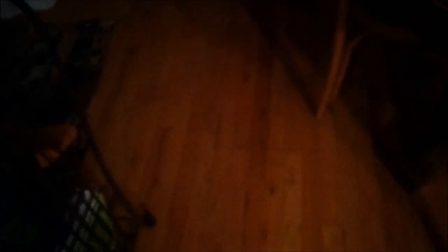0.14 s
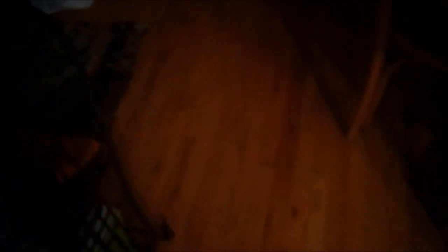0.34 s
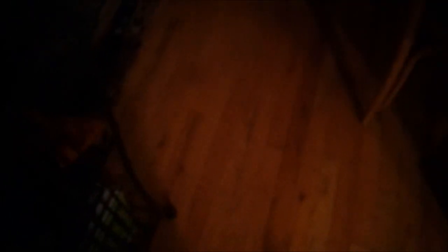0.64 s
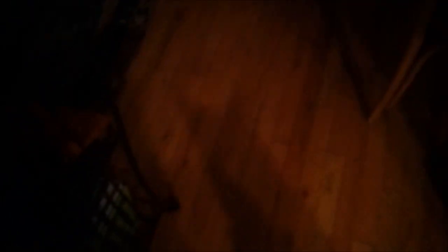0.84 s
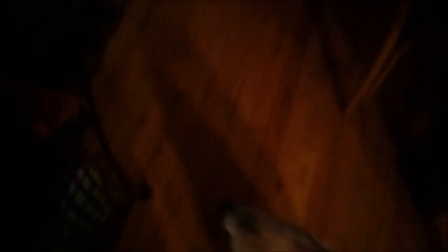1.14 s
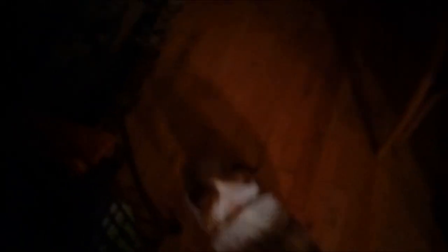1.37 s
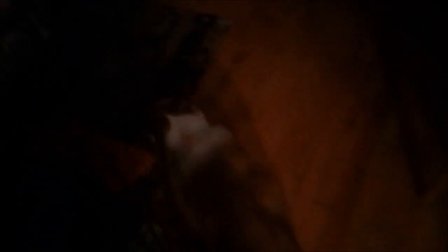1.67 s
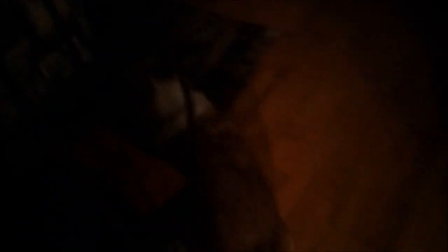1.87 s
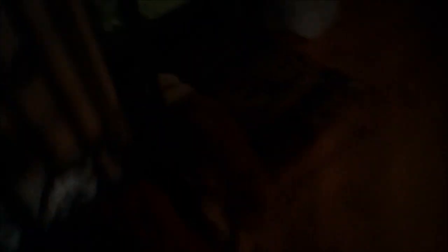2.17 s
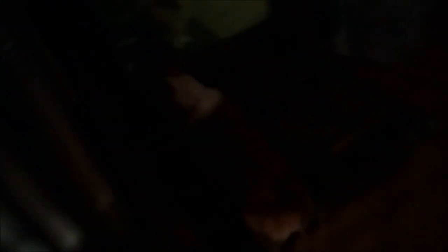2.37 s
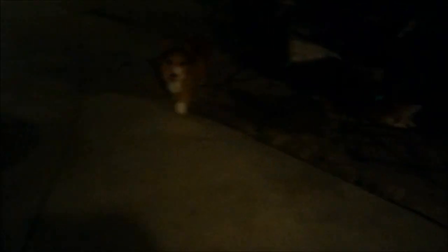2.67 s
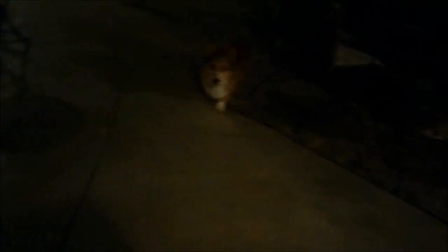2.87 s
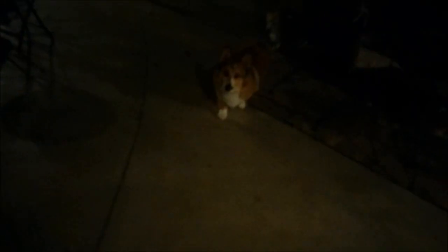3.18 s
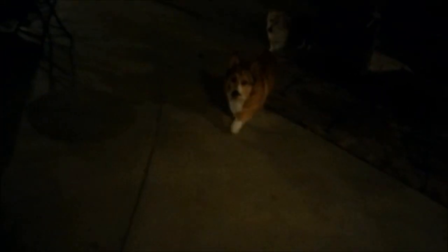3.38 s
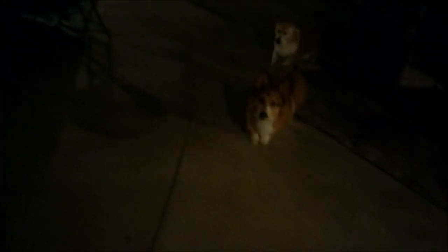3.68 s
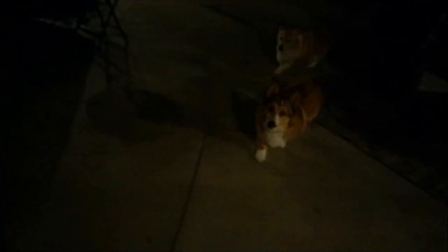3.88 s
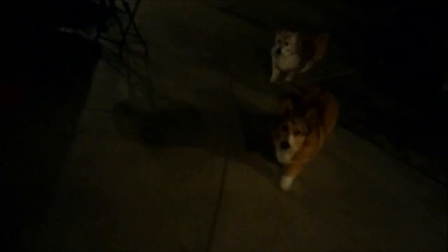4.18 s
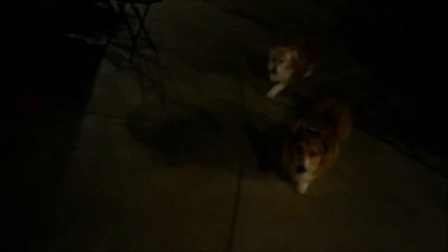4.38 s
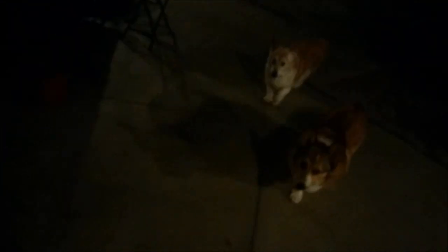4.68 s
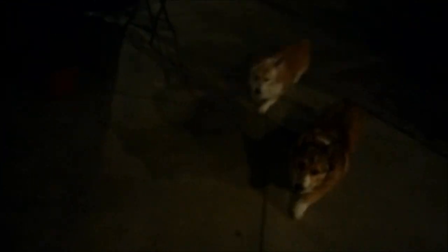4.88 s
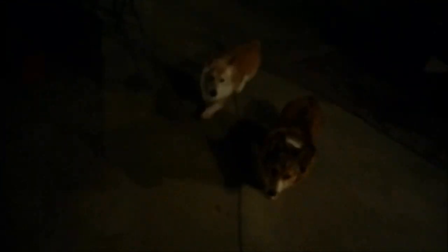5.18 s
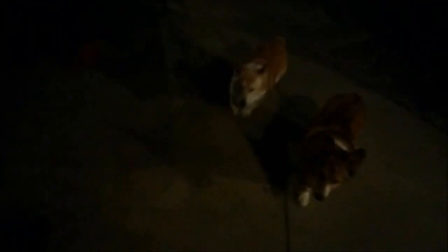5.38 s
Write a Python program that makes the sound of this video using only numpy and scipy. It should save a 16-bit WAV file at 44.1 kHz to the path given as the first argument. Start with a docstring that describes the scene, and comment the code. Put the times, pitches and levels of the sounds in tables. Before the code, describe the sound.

A dog's claws clatter quickly across a hardwood floor up close, then two dogs pad over concrete outdoors with faint ticks and scuffs.

```python
"""A dog trots across a hardwood floor nearby: each claw contact is a noise impact split into a tick, a knock
and a board thud, and the room answers as decaying noise whose tail is cut short. Then, outdoors, two dogs pad
over concrete: short claw impacts with gritty friction scuffs, and a collar tag made of decaying sine modes.
Behind them are a distant machine hum (wavering harmonics), low bumps near the microphone (sagging sines with
dull noise), and a background of filtered noise."""
import sys
import numpy as np
from scipy import signal
from scipy.fft import rfft, irfft, next_fast_len
from scipy.io import wavfile
from scipy.ndimage import uniform_filter1d, map_coordinates

SR = 44100
rng = np.random.default_rng(int(sys.argv[2]) if len(sys.argv) > 2 else 0)


def put_to_file(sound):
    """Save the sound as 16-bit audio at rate SR, in the file named by the first command-line argument."""
    columns = np.atleast_2d(sound).T  # one column per channel
    safe = np.clip(columns, -1, 1)
    whole_steps = np.round(safe * 32767)
    wavfile.write(sys.argv[1], SR, whole_steps.astype(np.int16))


N = 243814

# Levels in the tables are nominal source levels, before the fluctuations and gains in the functions.

# Quiet room noise, spectrum: hz, level_db
QUIET_SPECTRUM = [(18, -51), (30, -4.5), (350, -7.5), (519, -9), (676, -1.5), (4290, -24), (9990, -18.5),
                  (15200, -29.5), (16500, -49)]
# Outdoor background over time: time_s, rumble_db, rustle_db
AIR_LEVELS = [(2.3, -71.5, -72), (2.47, -66, -79), (2.69, -63.5, -78), (2.9, -62.5, -68),
              (3.15, -64.5, -76), (3.41, -63, -67), (3.52, -63.5, -77.5), (3.73, -66, -74.5),
              (4.3, -67.5, -72), (5.24, -66, -71), (5.53, -72, -72.5)]
# Far rumble, spectrum: hz, level_db
RUMBLE_SPECTRUM = [(25, -4), (77, 9.5), (120, 1), (250, 3.5), (420, -5), (640, -0.5), (720, 2.5), (800, -5),
                   (1000, -8.5), (1400, -25), (2000, -50.5)]
# Thin hiss, spectrum: hz, level_db
HISS_SPECTRUM = [(900, -15.5), (1400, 3.5), (2500, -4.5), (4000, -5.5), (5500, -12.5), (7000, -35.5)]
# Grit on concrete, spectrum: hz, level_db
RUSTLE_SPECTRUM = [(3500, -44), (5000, -28), (5800, -11), (8600, -1), (13000, -8.5), (15500, -8),
                   (16500, -30), (17000, -51.5)]
# Machine hum over time: time_s, second_order_db, fourth_order_db, fifth_order_db
HUM_LEVELS = [(2.4, -66, -77, -84), (2.47, -63, -71, -77), (2.63, -43, -57, -60), (2.73, -49, -61, -58),
              (2.88, -42.5, -68, -57), (3.01, -52, -79, -62), (3.07, -40, -84, -64), (3.12, -59, -88, -67),
              (3.19, -45, -88, -66), (3.33, -41.5, -80, -61), (3.58, -52, -67, -52.5),
              (3.83, -59, -71, -63), (4.06, -59, -75.5, -73.5), (4.4, -67, -74.5, -79),
              (4.78, -76, -73.5, -84), (5.15, -80, -76, -64), (5.38, -80, -68, -81), (5.53, -80, -83, -81)]
# Multiples of the machine's base frequency that sound: order (no unit)
HUM_MULTIPLES = [2, 4, 5]
# Low bumps near the microphone: start_s, level_db, mid_pitch_hz
BUMP_EVENTS = [(2.411, -37.5, 138), (2.454, -42, 141), (2.501, -42, 93), (2.56, -40.5, 185),
               (2.64, -34, 172), (2.674, -35, 189), (2.761, -39.5, 85), (2.846, -32, 78), (2.91, -39.5, 73),
               (3.236, -35, 83), (3.449, -44.5, 85), (3.715, -38, 84), (3.932, -47, 76), (4.059, -40.5, 87),
               (4.103, -41.5, 77), (4.19, -50, 127), (4.279, -41, 73), (4.329, -42.5, 85),
               (4.48, -51.5, 62), (4.555, -39, 78), (4.6, -47.5, 86), (4.703, -39, 82), (4.922, -41, 71),
               (5.295, -43.5, 73), (5.469, -40.5, 67)]
# Noisy part of a bump, spectrum: hz, level_db
PUFF_SPECTRUM = [(25, -27.5), (55, -12.5), (80, 0.5), (150, -8.5), (320, -10), (500, -24)]
# Strikes of the collar tag: start_s, level_db
TAG_STRIKES = [(3.4705, -54.5), (3.4925, -59), (3.5128, -71.5), (4.0186, -56), (4.566, -63)]
# Modes of the collar tag: pitch_hz, level_db, t60_s
TAG_MODES = [(1891.6, 2.5, 0.1841), (2365.2, -10, 0.1649), (2808.7, -2, 0.1098), (3540, -13.5, 0.0972)]
# Paws on concrete: start_s, tick_db, knock_db, scuff_relative_to_contact_db, scuff_ms
PAW_STEPS = [(2.7041, -68, -55, -12, 27), (2.7389, -36.5, -51, -12.5, 25), (2.797, -50.5, -59.5, -7, 65),
             (2.823, -33.5, -42, -16, 27), (2.828, -24.5, -29, -12.5, 26), (2.8631, -62, -29, -13.5, 32),
             (2.8671, -61, -21, -19, 16), (2.924, -56.5, -46, -10, 30), (3.2289, -33, -69, -13, 20),
             (3.2345, -41.5, -61.5, -14, 30), (3.3313, -39.5, -58.5, -12, 30),
             (3.3381, -30.5, -51.5, -13, 22), (3.3904, -40.5, -45.5, -10, 31),
             (3.4098, -28, -51.5, -22.5, 17), (3.4485, -50, -64, -6, 30), (3.4805, -44, -54, -13.5, 41),
             (3.7013, -54, -68, -5.5, 30), (3.7503, -58.5, -70, -2.5, 30),
             (3.7904, -51.5, -59.5, -10.5, 37), (3.846, -72, -57, -12, 30), (3.91, -51.5, -67, -8.5, 79),
             (4.047, -50, -63, -15, 30), (4.0774, -43, -53.5, -15, 36), (4.0819, -25.5, -45.5, -20, 14),
             (4.1434, -50, -73, -15.5, 24), (4.1859, -49, -73, -12, 28), (4.208, -51, -65.5, -3, 30),
             (4.2452, -41.5, -39.5, -12.5, 53), (4.2517, -35.5, -38, -2.5, 26),
             (4.3744, -38.5, -66, -18.5, 37), (4.3784, -32, -63, -20.5, 21), (4.4669, -53, -60, -11.5, 28),
             (4.5785, -50, -70, -14.5, 28), (4.6343, -35, -51.5, -11.5, 42),
             (4.6404, -36.5, -51.5, -12, 30), (4.6638, -51, -56, -6, 35), (4.7458, -46.5, -69, -20, 30),
             (4.8014, -29.5, -72, -14, 22), (4.808, -29.5, -71, -21, 32), (4.8485, -23, -41.5, -21, 30),
             (5.003, -50, -57.5, -11.5, 30), (5.0548, -38.5, -42.5, -.5, 42), (5.1003, -59, -31.5, -11, 17),
             (5.1409, -58, -75, -2.5, 34), (5.1903, -59.5, -56.5, -15, 25), (5.2235, -30.5, -73, -10, 30),
             (5.2264, -36.5, -57.5, -10, 30), (5.3964, -51, -74, -14, 30), (5.4213, -43, -69, -14, 30),
             (5.4812, -38.5, -38.5, -17.5, 33), (5.4859, -38.5, -40.5, -2.5, 43)]
# Bursts on the boards: start_s, tick_db, knock_db, thud_db, knock_pitch_hz, room_relative_to_contact_db
# They are claw contacts, except the one at .107 s: a faint smear of noise just before a contact.
BOARD_BURSTS = [(.045, -75, -62.5, -68.5, 1890, -9.5), (.107, -40.5, -39, -68, 1384, -10.5),
                (.111, -25, -30, -43, 3090, -11), (.124, -15.5, -22, -35.5, 1993, -11.5),
                (.206, -19.5, -25.5, -39, 2790, -14), (.294, -10, -21, -32.5, 3471, -14),
                (.43, -53, -39, -78, 1155, -19), (.488, -24.5, -29, -55, 3154, -11),
                (.501, -17.5, -21.5, -39.5, 3353, -12), (.569, -20.5, -26, -42.5, 2360, -10.5),
                (.646, -42.5, -41, -37, 2230, -10.5), (.683, -21.5, -31.5, -47, 1770, -16.5),
                (.689, -26, -42, -52, 3176, -15), (.752, -55, -33, -67, 2221, -17),
                (.887, -23, -30, -73, 2582, -12), (.913, -16.5, -22, -63, 2020, -11.5),
                (.992, -24, -27, -67, 1423, -11), (.999, -25, -31, -57, 2413, -10),
                (1.044, -34, -36, -49.5, 2390, -4.5), (1.074, -18, -22.5, -31.5, 2040, -13),
                (1.213, -59, -60.5, -65, 3700, -7), (1.267, -20.5, -27, -43.5, 3260, -13.5),
                (1.288, -15.5, -20, -32.5, 1688, -11), (1.377, -24.5, -34, -52, 4500, -12),
                (1.384, -23.5, -27.5, -36, 3196, -7), (1.461, -21.5, -29.5, -33, 2105, -12),
                (1.647, -21, -29, -42, 1740, -10), (1.654, -17.5, -23, -31.5, 1520, -10),
                (1.742, -27, -32.5, -35, 3361, -5), (1.776, -29, -27, -44, 2072, -8),
                (1.826, -26.5, -34.5, -39.5, 3270, -6.5), (1.99, -24, -35, -46, 3130, -6.5),
                (2.022, -16.5, -24.5, -33, 3630, -12), (2.14, -46, -33.5, -43, 4026, -5),
                (2.202, -26.5, -26, -37.5, 4678, -12), (2.304, -67.5, -58, -63.5, 1740, -11),
                (2.436, -78, -60, -44, 1400, -11)]
# Floorboards, spectrum: hz, level_db
BOARD_SPECTRUM = [(45, -40), (80, -13), (150, -1), (300, 1.5), (600, -7), (900, -27)]
# Claw body on the ground, spectrum: hz, level_db
KNOCK_SPECTRUM = [(400, -40), (700, -6), (1100, -3.5), (2200, -2), (3500, -2.5), (4600, -4), (6000, -29.5)]
# Claw tip, spectrum: hz, level_db
TICK_SPECTRUM = [(3500, -40), (5000, 4), (6500, 4.5), (9500, 3), (12000, -1.5), (15500, -10),
                 (16400, -23.5), (17000, -47.5)]

TOP_HZ = 17050  # upper band limit
OUTDOOR_START_S = AIR_LEVELS[0][0]
QUIET_DB = -58.5  # rms of the room noise
HISS_DB, HISS_FOLLOWS = -75, .6  # the hiss moves by this share of the rustle's change in dB
HUM_HZ, FLUTTER_DB = 107.63, 4.5  # base frequency; fast wavering of each order
BUMP_MS = 58  # full length
BOARD_CONTACT_MS, STONE_CONTACT_MS = 3.0, 1.3  # decay constants of the claw contact
THUD_HZ, THUD_HZ_PER_S = 360, -78  # the boards sound deeper along the dog's path
CUT_S, CUT_S_PER_DB = .138, .0022  # when the decaying tail is cut short, sooner for weak bursts
# light scuffs between the steps
FAINT_PER_S, FAINT_SPREAD_DB = 7, 3.5
FAINT_TICK_DB, FAINT_KNOCK_DB, FAINT_SCUFF_DB, FAINT_SCUFF_MS = -72, -70, 2.5, 35


def amp(db):
    """Decibel law: level to amplitude ratio."""
    return 10 ** (np.asarray(db) / 20)


def unit(x):
    """Normalisation to a root mean square of 1."""
    return x / np.sqrt(np.mean(x ** 2) + 1e-20)


def add(track, start_s, piece):
    """Superposition: sums piece into track from start_s."""
    track[round(start_s * SR):][:len(piece)] += piece


def curves(rows):
    """Linear interpolation of each column after the time, at -120 dB outside the rows."""
    time_s, *columns = np.transpose(rows)
    t = np.arange(N) / SR
    return [np.interp(t, time_s, column, left=-120, right=-120) for column in columns]


def wobble(rate):
    """Slow random modulation: a smooth curve through rate random knots a second."""
    knots = rng.standard_normal(int(N * rate / SR) + 4)
    return map_coordinates(knots, [np.arange(N) * rate / SR])


def filtered(x, response):
    """Linear filtering: the spectrum of x times a response of frequency."""
    size = next_fast_len(N + SR // 2)
    return irfft(rfft(x, size) * response(np.fft.rfftfreq(size, 1 / SR)), size)[:N]


def coloured(x, spectrum):
    """Spectral shaping through (Hz, dB) points, normalised to keep the power of white noise."""
    f, db = np.transpose(spectrum)

    def gain(hz):
        return unit(amp(np.interp(np.log(hz + 1), np.log(f), db, left=-120, right=-120)))

    return filtered(x, gain)


def rush(spectrum, patchy_db):
    """Stationary noise of rms 1, made uneven by random gain patches in time and frequency."""
    z = signal.stft(rng.standard_normal(N), nperseg=512)[2]
    across_frequency = uniform_filter1d(rng.standard_normal(z.shape), 3, 0)
    patches = unit(uniform_filter1d(across_frequency, 7, 1))
    noise = signal.istft(z * amp(patchy_db * patches), nperseg=512)[1][:N]
    return unit(coloured(noise, spectrum))


def grit(count, depth_db):
    """Granular modulation: grains under a millisecond long, a few of them standing out."""
    grains = np.minimum(rng.exponential(size=count // 24 + 1), 4) - 1
    return amp(depth_db * np.repeat(grains, 24)[:count])


def burst(start_s, envelope, peak_hz, peak_db, ripple_db):
    """Impact noise: fresh noise under an envelope, with one favoured pitch and random resonances."""
    count = len(envelope)
    hz = np.fft.rfftfreq(count, 1 / SR)
    ripple = map_coordinates(rng.standard_normal(200), [24 * np.log2(1 + hz / 100)])
    peak = np.exp(-(np.log((hz + 1) / peak_hz) / 0.16188) ** 2)
    colour = unit(amp(ripple_db * ripple + peak_db * peak))
    noise = irfft(colour * rfft(rng.standard_normal(count)), count)
    out = np.zeros(N + count)
    add(out, start_s, envelope * noise)
    return out[:N]


def contact(t, decay_ms):
    """Contact envelope: an onset within a millisecond or so, then a rattling exponential decay."""
    u = t * 1000 / decay_ms
    return 1.5 * (1 - np.exp(-u / .35)) * np.exp(-u) * grit(len(t), depth_db=1.5)


def background():
    """Broadband noise: a quiet room; then outdoors a lumpy far rumble, a thin hiss and a grainy rustle."""
    rumble_db, rustle_db = curves(AIR_LEVELS)
    hiss_db = HISS_DB + HISS_FOLLOWS * (rustle_db - AIR_LEVELS[-1][2])
    indoors = np.arange(N) < OUTDOOR_START_S * SR
    room = amp(QUIET_DB) * rush(QUIET_SPECTRUM, patchy_db=2) * indoors
    rumble = amp(rumble_db + 4.5 + 2.5 * wobble(18)) * rush(RUMBLE_SPECTRUM, patchy_db=3.2)
    hiss = amp(hiss_db) * rush(HISS_SPECTRUM, patchy_db=1.6)
    rustle_gain = amp(rustle_db + 1.5 * wobble(30) + 1.5 * wobble(300))
    rustle = rustle_gain * rush(RUSTLE_SPECTRUM, patchy_db=1)
    return room + rumble + hiss + rustle


def hum():
    """Harmonic synthesis: orders of a distant machine, nearly steady in pitch and wavering in level."""
    turns = HUM_HZ * np.arange(N) / SR + .02 * wobble(40)  # cycles, with slight phase jitter
    total = np.zeros(N)
    for order, level_db in zip(HUM_MULTIPLES, curves(HUM_LEVELS)):
        gain = amp(level_db + FLUTTER_DB * wobble(30) - 1.5)
        total += gain * np.sin(2 * np.pi * order * turns)
    return np.sqrt(2) * total  # sine peak for an rms level


def bumps():
    """Transient oscillation: a few cycles of a low swing sagging in pitch, with dull noise."""
    swing, gate = np.zeros((2, N + SR))
    t = np.arange(round(BUMP_MS * SR / 1000)) / SR
    progress = t / t[-1]
    for start_s, level_db, pitch_hz in BUMP_EVENTS:
        shape = amp(level_db) * np.sin(np.pi * progress) ** 1.295
        # pitch sags from about 1.1 to 0.9 of the listed one
        cycles = pitch_hz * t * (1.1 - 0.09895 * progress) + rng.random()
        add(swing, start_s, shape * np.sin(2 * np.pi * cycles))
        add(gate, start_s, shape)
    return .55 * swing[:N] + .5 * gate[:N] * rush(PUFF_SPECTRUM, patchy_db=1.5)


def collar_tag():
    """Modal synthesis: a small metal tag rings in decaying sines, unevenly as it swings."""
    out = np.zeros(N + SR)
    t = np.arange(SR // 3) / SR
    for start_s, strike_db in TAG_STRIKES:
        ring = np.zeros(len(t))
        for pitch_hz, level_db, t60_s in TAG_MODES:
            mode_db = level_db + rng.normal(0, 1.283) - 60 * t / t60_s
            ring += amp(mode_db) * np.sin(2 * np.pi * pitch_hz * t)
        add(out, start_s, amp(strike_db) * ring * (1 - np.exp(-t / .005)))
    return out[:N] * amp(4 * wobble(90) - 2)


def faint_steps():
    """Stratified chance: light outdoor steps, one at a random moment of each equal time slot."""
    duration_s = N / SR - OUTDOOR_START_S
    count = round(FAINT_PER_S * duration_s)
    steps = []
    for slot in range(count):
        start_s = OUTDOOR_START_S + duration_s * (slot + rng.random()) / count
        tick_db, knock_db = [FAINT_TICK_DB, FAINT_KNOCK_DB] + FAINT_SPREAD_DB * rng.standard_normal(2)
        steps.append((start_s, tick_db, knock_db, FAINT_SCUFF_DB, FAINT_SCUFF_MS))
    return steps


def outdoor_paws():
    """Impact and friction: dry ticks on concrete, each with the short gritty scuff of the pad."""
    t = np.arange(8000) / SR
    knock, tick = np.zeros((2, N))
    for start_s, tick_db, knock_db, scuff_db, scuff_ms in PAW_STEPS + faint_steps():
        scuff_decay = amp(scuff_db - 11.365 * (t * 1000 / scuff_ms) ** 1.8)
        scuff = scuff_decay * (1 - np.exp(-t / 0.005841)) * grit(len(t), depth_db=2.5)
        step = contact(t, STONE_CONTACT_MS) + scuff
        knock += burst(start_s, amp(knock_db) * step, 2200, peak_db=4.5, ripple_db=3.5)
        tick += burst(start_s, amp(tick_db) * step, 8500, peak_db=1.1, ripple_db=2.1)
    return coloured(knock, KNOCK_SPECTRUM) + coloured(tick, RUSTLE_SPECTRUM)


def clipped_tail(t, t60_s, strongest_db):
    """Exponential decay of room sound, its tail then cut short steeply, sooner for weak bursts."""
    cut_s = max(CUT_S + CUT_S_PER_DB * strongest_db, .03)
    cut_db = -12 * (t / cut_s) ** 4
    return (1 - np.exp(-t / 0.0036)) * amp(-60 * t / t60_s + cut_db)


def indoor_claws():
    """Impact excitation: a claw tick, a knock and a board thud, each with a shortened room tail."""
    t = np.arange(11000) / SR
    thud, knock, tick = np.zeros((3, N))
    for start_s, tick_db, knock_db, thud_db, knock_hz, room_db in BOARD_BURSTS:
        strongest_db = max(tick_db, knock_db)
        hit, scatter = contact(t, BOARD_CONTACT_MS), grit(len(t), depth_db=1.5)

        thud_shape = amp(thud_db) * clipped_tail(t, 0.364, strongest_db)
        thud_hz = THUD_HZ + THUD_HZ_PER_S * start_s
        thud += burst(start_s, thud_shape, thud_hz, peak_db=8.5, ripple_db=4)

        knock_room = amp(room_db + 6) * scatter * clipped_tail(t, 0.43155, strongest_db)
        knock += burst(start_s, amp(knock_db) * (hit + knock_room), knock_hz, peak_db=4, ripple_db=2.5)
        # the claw itself rings for a few milliseconds
        ring_shape = (1 - np.exp(-t / .001)) * amp(-60 * t / .05)
        add(knock, start_s, amp(knock_db - 10.5) * np.sin(2 * np.pi * knock_hz * t) * ring_shape)

        tick_room = amp(room_db) * scatter * clipped_tail(t, 0.32298, strongest_db)
        tick += burst(start_s, amp(tick_db) * (hit + tick_room), 9000, peak_db=1.0, ripple_db=2.0)
    boards = coloured(thud, BOARD_SPECTRUM)
    return boards + coloured(knock, KNOCK_SPECTRUM) + coloured(tick, TICK_SPECTRUM)


def scene():
    """Superposition of all sources in one channel."""
    surroundings = background() + hum() + bumps()
    return (surroundings + collar_tag() + outdoor_paws() + indoor_claws())[None]


def record(dry):
    """Band limitation: nothing passes at or above TOP_HZ."""
    return filtered(dry[0], lambda hz: hz < TOP_HZ)[None]


dry = scene()
out = record(dry)
put_to_file(out)
```